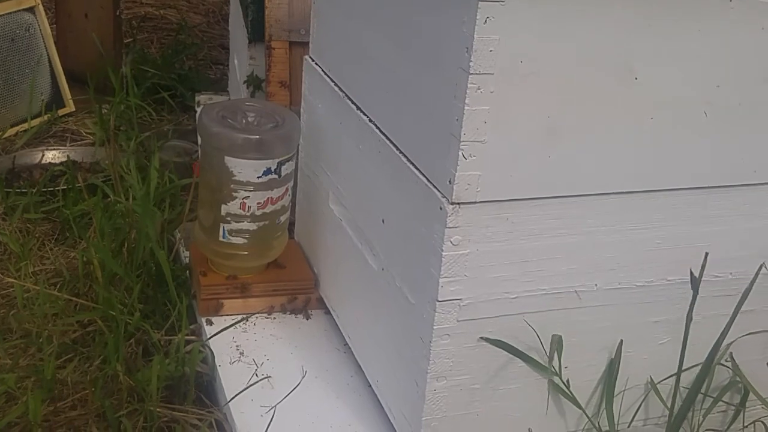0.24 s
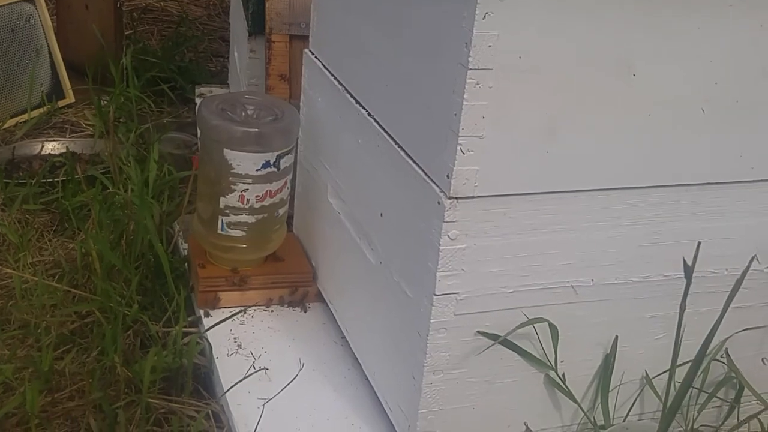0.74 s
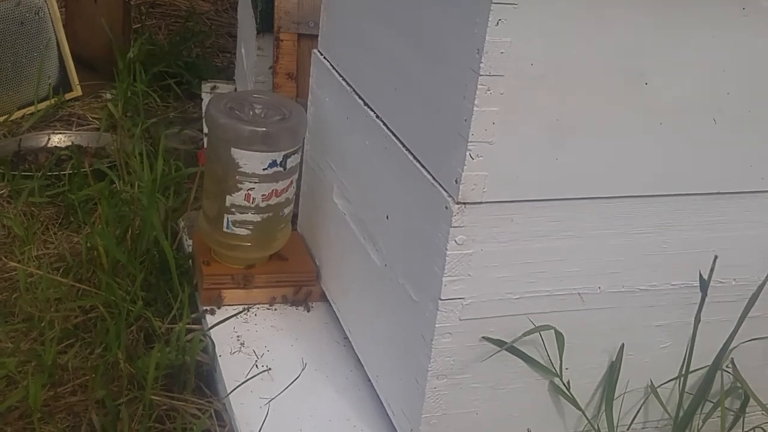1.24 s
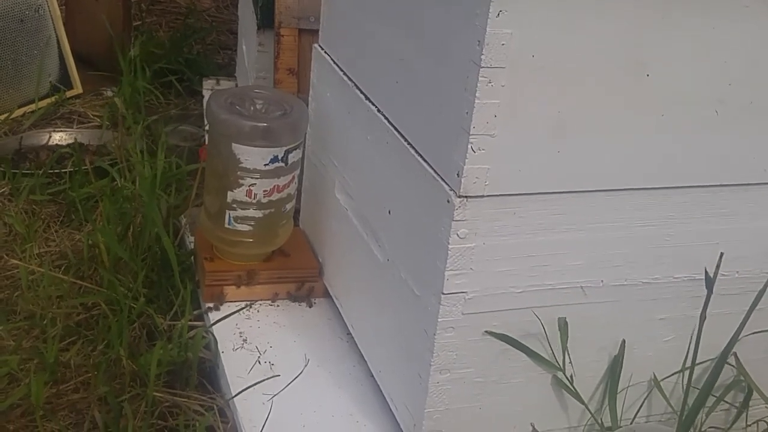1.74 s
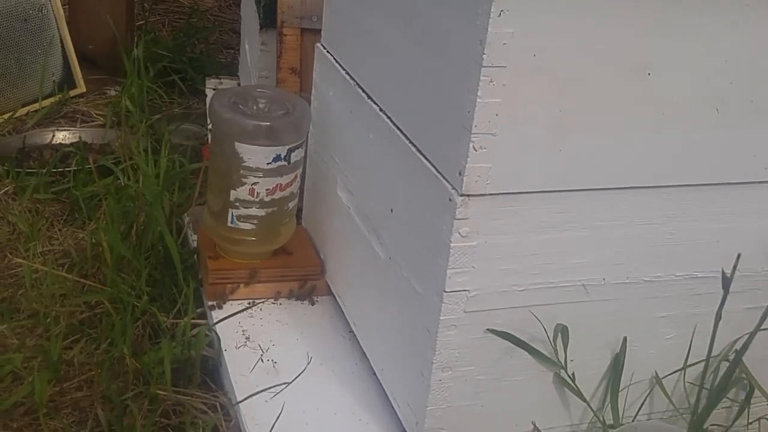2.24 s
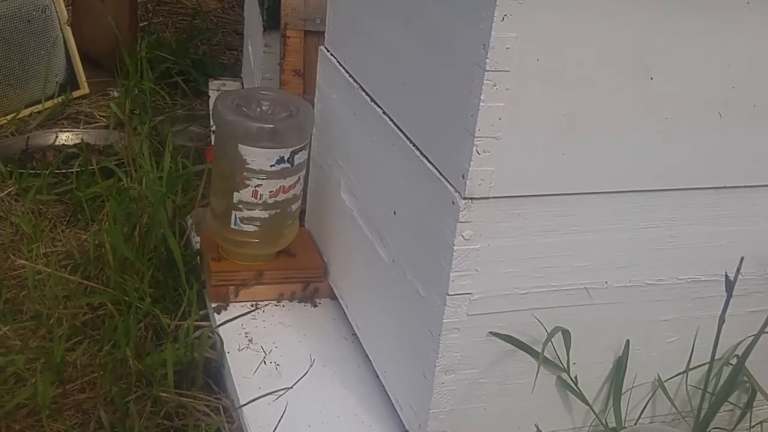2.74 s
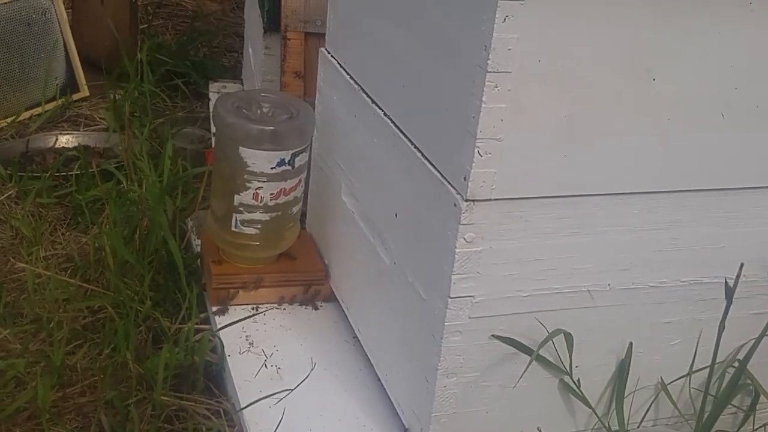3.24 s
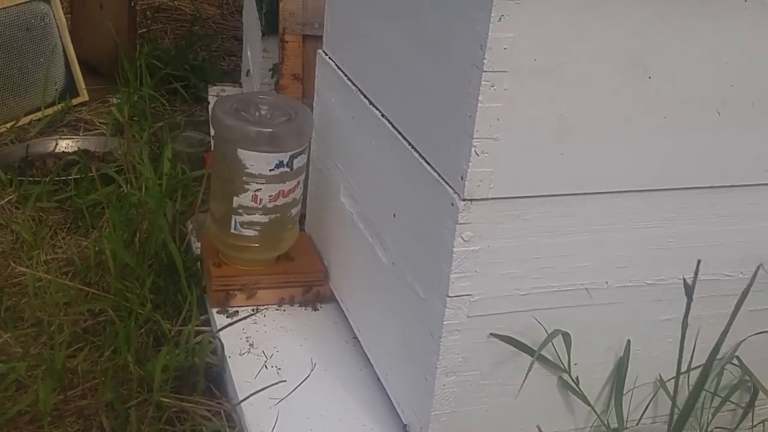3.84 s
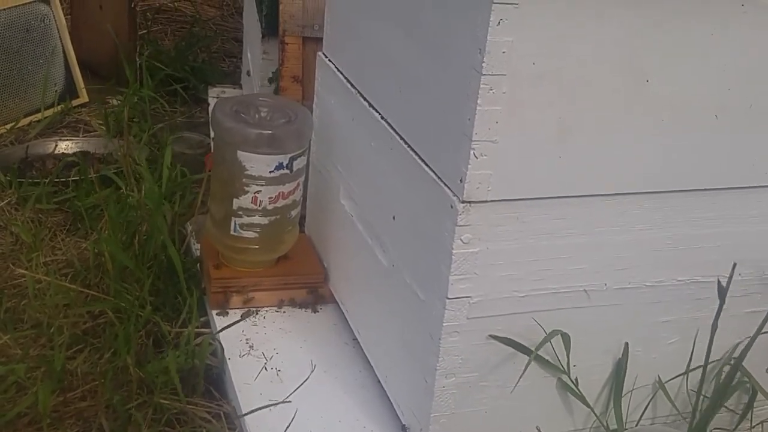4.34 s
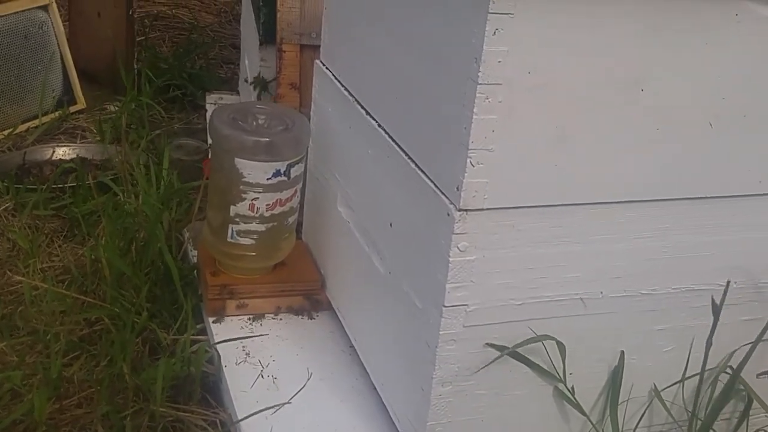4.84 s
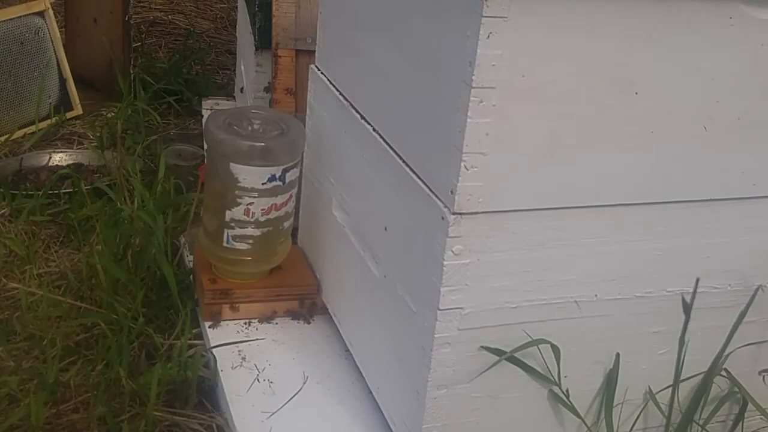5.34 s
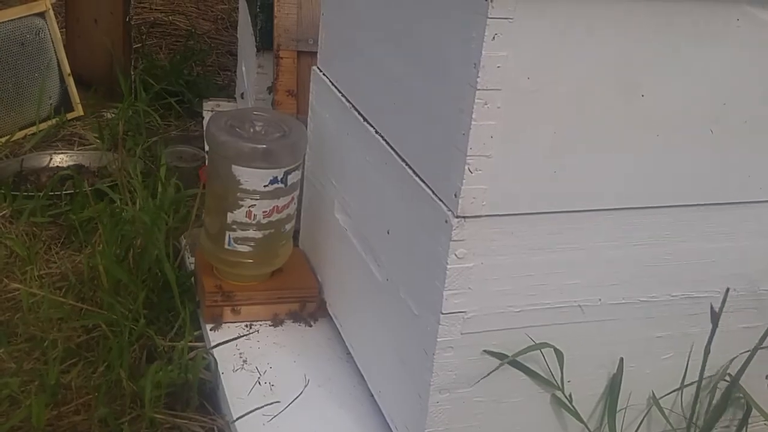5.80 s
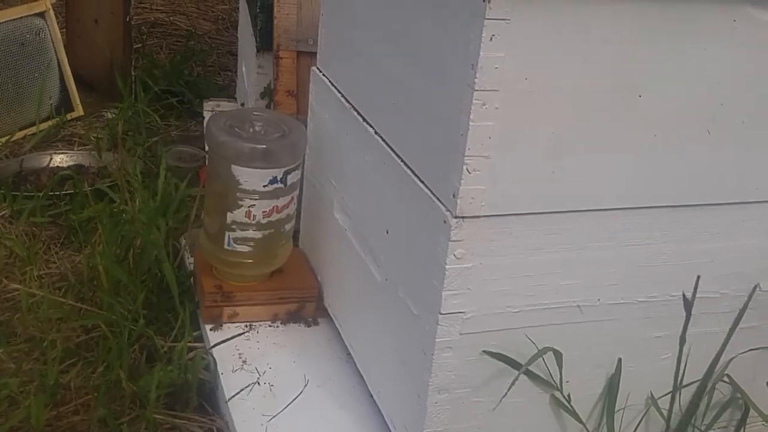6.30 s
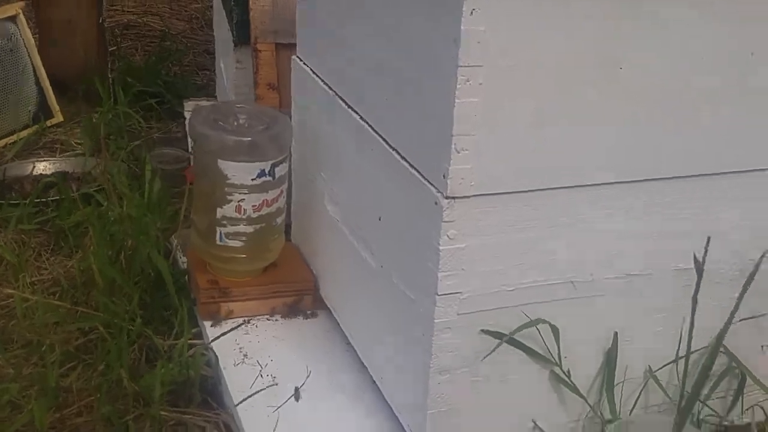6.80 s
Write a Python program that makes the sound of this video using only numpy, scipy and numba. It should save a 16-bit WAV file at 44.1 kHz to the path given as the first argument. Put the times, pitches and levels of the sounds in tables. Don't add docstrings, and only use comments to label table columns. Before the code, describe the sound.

Outdoors by a beehive, a close bee hums with a wavering pitch, then recedes under wind. Gusts buffet the hand-held microphone, heavy and low on the left, weak and dull on the right, with a few crackling overloads. A distant swarm hums softly behind, and near the end a bee zips past with a grassy rustle.

```python
import sys
import numpy as np
from scipy import signal
from scipy.fft import rfft, irfft, next_fast_len
from scipy.io import wavfile
from scipy.ndimage import uniform_filter1d, minimum_filter1d
from numba import njit

SR = 44100
rng = np.random.default_rng(int(sys.argv[2]) if len(sys.argv) > 2 else 0)


def attenuation_scalar(level_db):
    decades = np.asarray(level_db, float) / 20
    return 10 ** decades


def materialize(psi):
    bounded = np.clip(np.atleast_2d(psi).T, -1, 1)
    quanta = np.round(bounded * 32767).astype(np.int16)
    wavfile.write(sys.argv[1], SR, quanta)


N = 311346

# start_s, hold_s, level_db, sharpness_oct
LEFT_GUSTS = [(.12, 0.21, -18, 1.8), (.44, 0.066, -18, 1.79), (1.185, 0.082, -11.5, 2.02),
              (1.36, .2, -10.5, 1.94), (1.58, 0.24, -12, 2.0), (1.96, .1, -11.5, 1.8),
              (2.0, 0.039, -10.5, 2.48), (2.21, 0.13, -9.5, 2.35), (2.37, .125, -14.5, 1.85),
              (2.63, .18, -15, 1.5), (2.86, .1, -13, 1.75), (2.97, 0.083, -7.5, 2.6),
              (3.11, .08, -12, 2.28), (3.26, 0.12, -12, 1.17), (3.385, 0.15, -6.5, 2.41),
              (3.54, 0.1, -1.5, 2.91), (3.69, 0.066, -6.5, 2.93), (3.9, 0.19, -15, 1.4),
              (4.65, .11, -7.5, 1.85), (4.77, 0.16, -0.5, 3.07), (5.0, .13, -7, 2.47),
              (5.13, 0.073, -4, 3.23), (5.21, 0.071, -9.5, 2.74), (5.86, 0.083, -3, 2.39),
              (5.95, 0.085, 0.5, 3.16), (6.05, .235, -4.5, 3.13), (6.35, .06, -13.5, 1.6),
              (6.44, 0.11, -10, 2.75), (6.59, .16, -5, 2.85), (6.8, .11, -18, 2.26)]
# peak_s, peak_db, sharpness_oct, length_ms
LEFT_SLAPS = [(.425, -5, 1.73, 9.3), (.913, -17.5, 1.87, 17), (1.208, -2, 2.55, 28), (1.256, -6.5, 2, 8),
              (1.322, -6.5, 2.43, 10), (1.445, -5.5, 2.22, 17), (1.522, 0, 2.83, 26),
              (1.658, -5.5, 2.27, 14), (1.715, -5, 2.2, 22), (1.979, -2, 2.46, 11), (2.229, 2.5, 3.21, 23),
              (2.305, 0, 3.06, 22), (2.341, -4, 3.06, 12), (2.703, -5.5, 1.75, 20.4),
              (2.891, -0.5, 1.86, 23), (3.0, 0, 3.32, 16), (3.034, -2.5, 2.74, 24), (3.171, -4.5, 2.15, 22),
              (3.809, -.5, 2.6, 23), (3.869, -11.5, 2.67, 9), (3.928, -4.5, 2.37, 26),
              (3.981, -3.5, 2.68, 25), (4.121, -4.5, 1.7, 20.3), (4.6, -8, 1.45, 20),
              (5.081, -3.5, 2.57, 8.8), (5.556, -9, 1.91, 17.6), (6.432, -1.5, 2.81, 22),
              (6.775, -5.5, 3.24, 11), (6.874, -5, 2.52, 14.3), (6.904, -3, 2.7, 19)]
# start_s, hold_s, level_db
RIGHT_GUSTS = [(0.127, 0.079, -23), (0.188, 0.12, -16), (0.373, .13, -17.5), (.53, .05, -23),
               (0.596, 0.019, -14), (0.761, 0.041, -12), (.83, .09, -24), (0.999, 0.029, -20.5),
               (1.1, .03, -27), (1.258, .08, -28), (1.44, .05, -26), (1.655, .04, -19), (1.85, 0.061, -28),
               (2.303, 0.36, -28.5), (3.05, .1, -28.5), (3.158, .14, -15.5), (3.733, 0.033, -12.5),
               (3.78, 0.19, -24), (4.183, .3, -22), (4.56, 0.1, -23), (4.83, .2, -31.5), (5.16, .03, -31),
               (5.46, 0.37, -26), (6.002, 0.34, -32.5), (6.36, .2, -28), (6.56, .04, -16),
               (6.79, 0.26, -31)]
# time_s, level_db
LEFT_LULL = [(0, -25.5), (.52, -32), (.7, -35.5), (.85, -28), (1.06, -40), (1.13, -21), (1.3, -23.5),
             (1.88, -17.5), (2.15, -16.5), (2.55, -26), (3.9, -22.5), (4.3, -19.5), (4.48, -25),
             (4.97, -15.5), (5.35, -24), (5.75, -26.5), (6.3, -25), (7.06, -25)]
# time_s, level_db
RIGHT_LULL = [(0, -37), (2.0, -42.5), (7.06, -43)]
# time_s, peak_db
CAPSULE_CRACKS = [(2.227, -37), (2.337, -36), (2.996, -23.5), (3.595, -44), (3.606, -25.5), (3.625, -28.5),
                  (4.842, -37.5), (4.851, -26), (4.856, -18), (4.864, -12), (4.869, -19), (4.876, -24),
                  (4.886, -27), (4.894, -28), (4.8964, -30.5), (4.901, -30), (5.083, -29), (5.965, -27.5),
                  (5.983, -21), (5.996, -8), (5.999, -19), (6.017, -23), (6.093, -26), (6.193, -40.5),
                  (6.427, -38), (6.773, -36)]
# time_s, wingbeat_hz, right_level_db
BEE_PATHS = [
    [(0, 272, -53), (.13, 267, -45), (.24, 262, -46), (.37, 279, -52), (.42, 263, -55), (.5, 283, -44),
     (.58, 279, -53), (.64, 261, -48), (.72, 262, -58)],
    [(.77, 281, -56), (.95, 283, -61), (1.3, 289, -65)],
    [(2.2, 235, -61), (2.44, 241, -58), (2.68, 232, -63), (3.04, 231, -68)],
    [(6.28, 240, -70), (6.37, 242, -66), (6.64, 231, -63)],
    [(6.75, 275, -60), (6.79, 273, -45), (6.81, 267, -42), (6.84, 256, -50), (6.91, 254, -59)],
]
BEE_PANS_DB = [-4, -4, -1, -2, -8]
# frequency_hz, level_db
WING_SPECTRUM = [(260, 8), (530, 4), (800, -5), (1100, -7), (1400, -11), (2000, -21), (3200, -28)]
# frequency_hz, level_db
SWARM_SPECTRUM = [(120, -40), (200, -2), (420, 7), (800, -1.5), (1400, -6.5), (2000, -19), (3200, -30),
                  (6000, -60)]
# peak_s, peak_db, rise_s_per_10db, fall_s_per_10db
RUSTLES = [
    (.2, -56.5, 0.3, .25),
    (6.81, -53, 0.15, 0.2),
    (6.98, -44.5, 0.1, 0.2),
]
# time_s, peak_db, left_minus_right_db
BOX_TICKS = [
    (2.990, -36, -15),
    (3.789, -39, 7),
    (4.399, -38.5, -23),
    (6.985, -38, 7),
]
# frequency_hz, density_db_per_hz
LEFT_HUSH = [(60, -59), (300, -82.5), (1200, -91), (2500, -98), (6000, -98), (7500, -96), (8400, -86),
             (9500, -93), (12000, -93.5), (15500, -101)]
# frequency_hz, density_db_per_hz
RIGHT_HUSH = [(60, -72), (300, -85), (1200, -94), (2500, -99), (5000, -97), (6200, -92), (7000, -83),
              (7800, -90.5), (9500, -96), (15500, -101)]
# left_hz, right_hz
HOLE_HZ = (8400, 7030)


def curve(rows):
    time_s, *columns = np.transpose(rows)
    return [np.interp(np.arange(N) / SR, time_s, column) for column in columns]


def colour(points, hz):
    point_hz, db = np.transpose(points)
    return np.interp(np.log(np.maximum(hz, 1)), np.log(point_hz), db)


def walk(rate_hz):
    step = 16
    hold = int(SR / rate_hz / step)
    held = rng.standard_normal(4000)[np.arange(N // step + 2) // hold]
    slewed = uniform_filter1d(uniform_filter1d(held, hold), hold)
    return 1.3 * np.interp(np.arange(N) / step, np.arange(len(held)), slewed)


@njit
def svf(x, hz, damp):
    y = np.empty((2, len(x)))
    b, l = 0., 0.
    for i in range(len(x)):
        g = np.tan(np.pi * hz[i] / SR)
        v = (b + g * (x[i] - l)) / (1 + g * (g + damp))
        y[0, i] = l + g * v
        y[1, i] = damp * v
        b, l = 2 * v - b, l + 2 * g * v
    return y


def band(x, hz, damp):
    return svf(x, np.full(N, 1. * hz), damp)[1]


def wind(gusts, slaps, lull, flow_oct, corner_hz, flutter_db, buffet_db, slap_kick, finest_hz):
    attack_ms, release_ms = 7, 11.2
    t = np.arange(N) / SR
    throb = walk(38)
    puff = np.roll(throb, SR)
    flow_db = curve(lull)[0] + 3.0 * puff
    power = attenuation_scalar(flow_db - 5.0) ** 2
    sharp = power * (flow_oct + 0.019 * (flow_db + 27.0) + 0.29 * puff)

    for start_s, hold_s, db, octaves in gusts:
        i = slice(max(int((start_s - .1) * SR), 0), int((start_s + hold_s + .1) * SR))
        early_s = np.maximum(start_s - t[i], 0)
        late_s = np.maximum(t[i] - start_s - hold_s, 0)
        outside = 1000 * (early_s / attack_ms + late_s / release_ms)
        bump = attenuation_scalar(db - 4.5) ** 2 * np.exp(-outside ** 2)
        power[i] += bump
        sharp[i] += bump * octaves

    buffet = attenuation_scalar(buffet_db * throb) ** 2
    sharp = (sharp + 0.08 * throb * power) * buffet
    power = power * buffet

    kicks = np.zeros(N)
    for peak_s, db, octaves, length_ms in slaps:
        i = slice(int((peak_s - .1) * SR), int((peak_s + .1) * SR))
        bump = attenuation_scalar(db - 3.5) ** 2 * np.exp(-((t[i] - peak_s) / (length_ms / 2400)) ** 2)
        power[i] += bump
        sharp[i] += bump * octaves
        kicks[int((peak_s - .002) * SR)] = slap_kick * np.sqrt(20 / length_ms)

    flutter = walk(90)
    size_oct = .28 * walk(170)
    hz = np.clip(corner_hz * 2 ** (sharp / power + size_oct), 40, finest_hz)
    eddies_per_s = 75 + .09 * hz
    hits = rng.random(N) < eddies_per_s / SR
    eddies = hits * rng.standard_normal(N) * np.sqrt(SR / eddies_per_s)
    x = 0.9 * eddies + 0.2 * rng.standard_normal(N) + kicks * rng.choice([-1, 1], N)
    density = power * SR / 2 / hz
    x = x * np.sqrt(density) * attenuation_scalar(flutter_db * flutter)

    roll = np.sqrt(uniform_filter1d(density, size=1500)) * rng.standard_normal(N)
    x = x - .5 * band(x, 68.7, 3.84) + 1.414 * band(roll, 75.8, 0.94)
    for _ in range(4):
        x = svf(x, hz, 1.545)[0]
    return x


def left_wind():
    return wind(LEFT_GUSTS, LEFT_SLAPS, LEFT_LULL, flow_oct=1.1, corner_hz=123.7,
                flutter_db=1.0, buffet_db=1.2, slap_kick=17.9, finest_hz=2600)


def right_wind():
    gusts = [(s, hold_s, db, 1.455 + .03 * (db + 20)) for s, hold_s, db in RIGHT_GUSTS]
    return wind(gusts, [], RIGHT_LULL, flow_oct=0.74, corner_hz=109.3,
                flutter_db=1.5, buffet_db=2.5, slap_kick=0, finest_hz=420)


def cracks():
    kinks = np.zeros(N)
    for time_s, db in CAPSULE_CRACKS:
        at = int(time_s * SR) + rng.integers(-45, 45, 4)
        kinks[at] += attenuation_scalar(db + 38.5) * rng.uniform(0.97, 1, 4) * rng.choice([-1, 1], 4)
    body = band(band(kinks, 1237, 0.65), 1600, 4.4)
    return svf(body, np.full(N, 2500.), 2.85)[0] + .3 * body


def bee(hz, tremble_share):
    tremble = tremble_share * walk(30)[:len(hz)]
    turn = attenuation_scalar(4.5 * walk(16))
    beat = np.exp(2j * np.pi * np.cumsum(hz * (1 + tremble)) / SR)
    out, partial = 0, 1
    for k in range(1, 11):
        partial = partial * beat
        flicker = np.roll(turn, k * N // 11)[:len(hz)]
        out = out + attenuation_scalar(colour(WING_SPECTRUM, k * hz.mean())) * flicker * partial.real
    return out


def bees():
    out = np.zeros((2, N))
    fade_s = .04
    for rows, pan_db in zip(BEE_PATHS, BEE_PANS_DB):
        start_s, end_s = rows[0][0], rows[-1][0]
        i = slice(max(int((start_s - fade_s) * SR), 0), int((end_s + fade_s) * SR))
        hz, db = curve(rows)
        fade, = curve([(start_s - fade_s, 0), (start_s, 1), (end_s, 1), (end_s + fade_s, 0)])
        level = attenuation_scalar(db[i] + 2.5 * walk(22)[i] - 1.5)
        near = bee(hz[i], .02) * level * fade[i]
        out[:, i] += [attenuation_scalar(pan_db) * np.roll(near, 9), near]
    return out


def swarm():
    beats = np.zeros((2, N))
    for base_hz in rng.uniform(200, 295, 12):
        wander = .04 * walk(3.5) + .03 * walk(17)
        nearness_db = 4 * walk(4)
        cycles = np.cumsum(base_hz * (1 + wander)) / SR
        pushes = np.diff(np.floor(cycles), prepend=0)
        far = pushes * SR / 2 / base_hz * attenuation_scalar(nearness_db - 72.5)
        beats += [np.roll(far, rng.integers(-60, 60)), far]
    size = next_fast_len(N)
    hz = np.fft.rfftfreq(size, 1 / SR)
    return irfft(rfft(beats, size) * attenuation_scalar(colour(SWARM_SPECTRUM, hz)), size)[:, :N]


def rustle():
    t = np.arange(N) / SR
    swells_db = []
    for peak_s, db, rise_s, fall_s in RUSTLES:
        swells_db.append(db - 10 * np.where(t < peak_s, (peak_s - t) / rise_s, (t - peak_s) / fall_s))
    level_db = np.maximum(np.max(swells_db, axis=0), -74)
    level = attenuation_scalar(level_db + 3.2 * walk(60))
    out = []
    for hole_hz in HOLE_HZ:
        grass = level * rng.standard_normal(N)
        out.append(2.3 * band(grass, 980, 1.65) + 0.43 * grass + band(grass, hole_hz, 0.34))
    return np.array(out)


def ticks():
    out = []
    for side, hole_hz in zip((1, -1), HOLE_HZ):
        taps = np.zeros(N)
        for time_s, db, pan_db in BOX_TICKS:
            taps[int(time_s * SR)] = attenuation_scalar(db + 30 + side * pan_db / 2)
        out.append(band(taps, hole_hz, 0.039) + 0.02 * taps)
    return np.array(out)


def hush():
    hz = np.fft.rfftfreq(N, 1 / SR)
    out = []
    for points in (LEFT_HUSH, RIGHT_HUSH):
        spectrum = rfft(rng.standard_normal(N)) * attenuation_scalar(colour(points, hz)) * np.sqrt(SR / 2)
        out.append(irfft(spectrum, N) * attenuation_scalar(0.48 * walk(21)))
    return np.array(out)


def gain():
    rest_db, early_db, early_s = 1.6, 2.4, 1.1
    duck_from_db, duck_per_db, duck_max_db, recover_s = -42, .17, 7.5, .37
    time_s, db = np.transpose(CAPSULE_CRACKS)
    jolts = np.zeros(N)
    jolts[(time_s * SR).astype(int)] = duck_per_db * np.maximum(db - duck_from_db, 0)
    pull_db = signal.lfilter([1], [1, -np.exp(-1 / recover_s / SR)], jolts)
    duck_db = uniform_filter1d(duck_max_db * np.tanh(pull_db / duck_max_db), size=900)
    return attenuation_scalar(rest_db + early_db * np.exp(-np.arange(N) / SR / early_s) - duck_db)


def scene():
    ports = np.array([left_wind() + cracks(), right_wind()])
    background = swarm() + rustle() + ticks() + hush()
    return ports + bees() + gain() * background


def low_pass(x):
    return signal.sosfilt(signal.butter(12, 15780, fs=SR, output="sos"), x)


def record(dry):
    x = signal.sosfilt(signal.butter(4, 52, "high", fs=SR, output="sos"), dry)
    x = np.array([c - .84 * band(c, 492, .36) for c in x])
    x = np.array([c + 0.64 * band(c, 661, 0.29) for c in x])
    ceiling = .9
    room = minimum_filter1d(ceiling / np.maximum(abs(x), ceiling), size=301, axis=1)
    x = x * uniform_filter1d(room, size=301, axis=1)
    return low_pass(x)


dry = scene()
out = record(dry)
materialize(out)
```